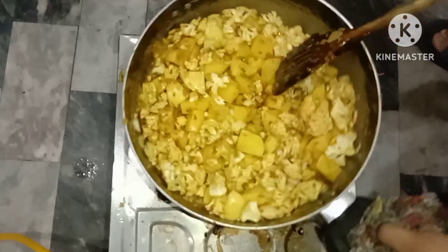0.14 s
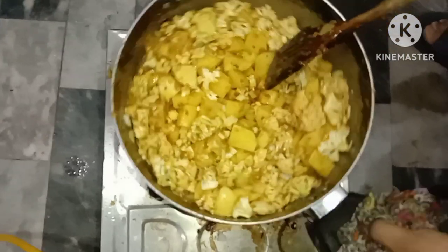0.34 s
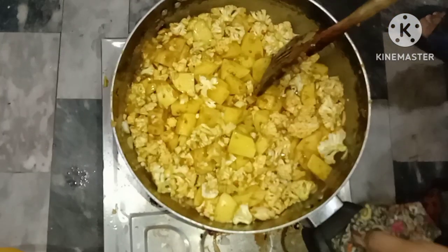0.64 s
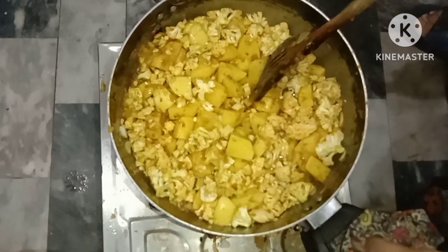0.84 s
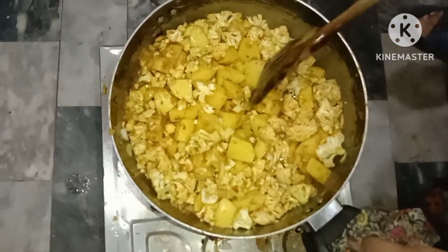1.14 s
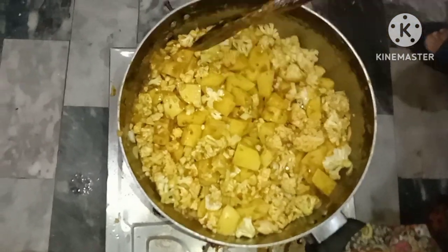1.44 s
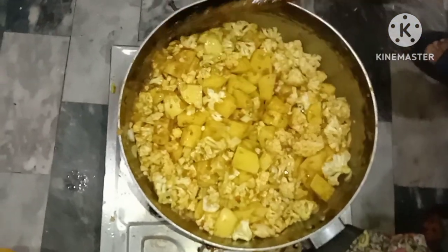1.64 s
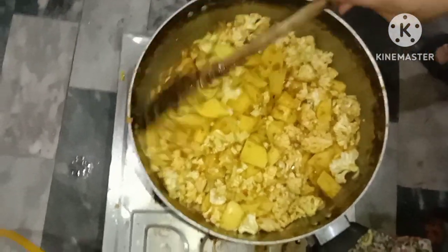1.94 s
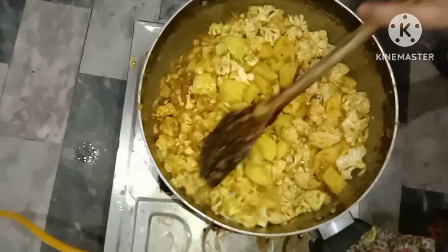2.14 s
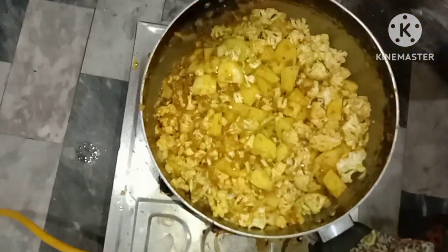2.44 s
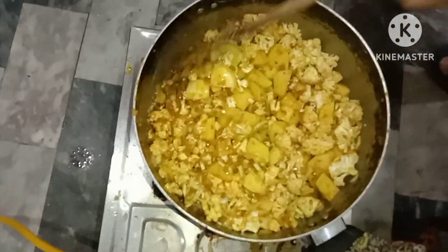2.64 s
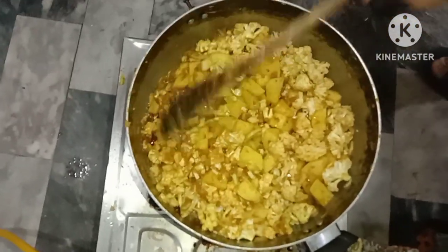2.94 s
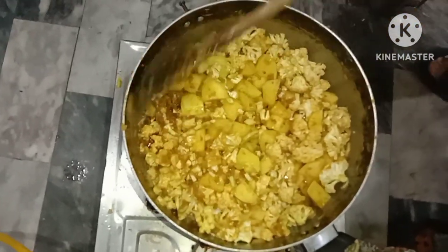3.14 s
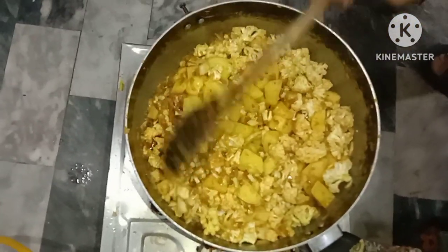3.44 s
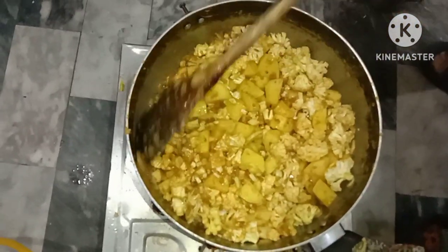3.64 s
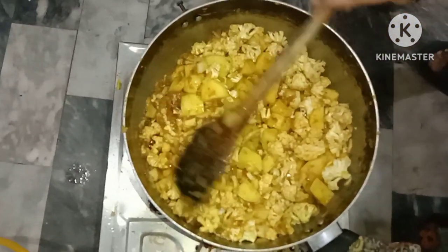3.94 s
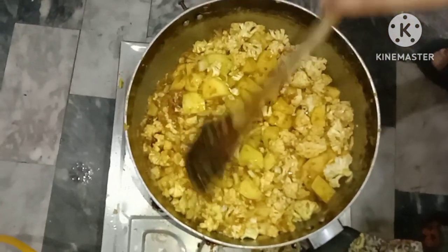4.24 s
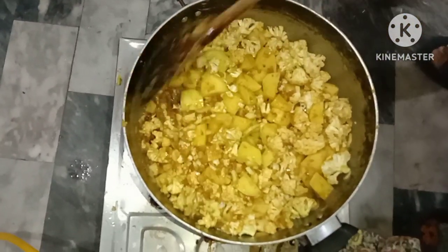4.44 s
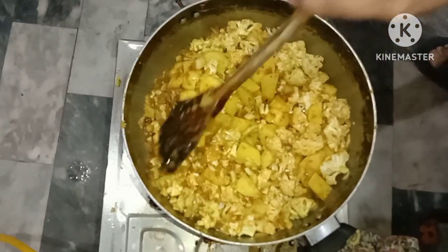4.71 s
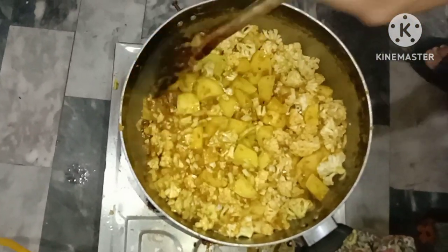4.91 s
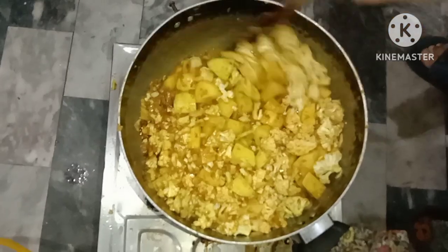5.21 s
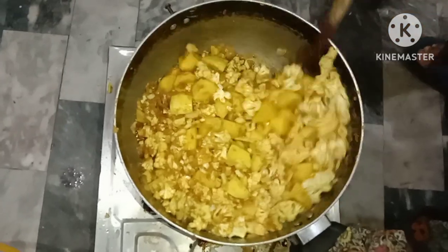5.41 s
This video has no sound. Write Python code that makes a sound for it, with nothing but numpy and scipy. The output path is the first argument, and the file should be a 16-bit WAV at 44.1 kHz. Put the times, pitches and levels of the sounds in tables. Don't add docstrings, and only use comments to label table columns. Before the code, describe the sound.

Rapid distant knocking rings off hard walls and fades, leaving vegetables fizzing in a pan, soft spoon taps and a last burst of livelier crackling.

```python
import sys
import numpy as np
from scipy import signal
from scipy.fft import rfft, irfft, next_fast_len
from scipy.io import wavfile
from scipy.ndimage import uniform_filter1d, map_coordinates

SR = 44100
rng = np.random.default_rng(int(sys.argv[2]) if len(sys.argv) > 2 else 0)


def gain_from_db(level_db):
    decades = np.asarray(level_db, float) / 20
    return 10 ** decades


def materialize(psi):
    bounded = np.clip(np.atleast_2d(psi).T, -1, 1)
    quanta = np.round(bounded * 32767).astype(np.int16)
    wavfile.write(sys.argv[1], SR, quanta)


N = 245618

# f/Hz, density/dB per Hz
MIC_FLOOR = [(20, -99), (60, -101), (110, -96.5), (200, -100), (290, -95), (400, -101.5), (900, -99)]
# f/Hz, density/dB per Hz
BURNER = [(430, -17), (520, -15), (650, -9), (790, -16.5), (950, -3.5), (1090, -10.5), (1200, -4.5)]
# f/Hz, width/Hz, level/dB
BURNER_NOTE = (292, 14, -75)
# t/s, length/s, centre f/Hz, level/dB
WISPS = [(0.975, 0.11, 704, -48), (0.98, 0.2, 497, -52), (1.103, 0.09, 990, -52.5), (1.804, 0.05, 440, -57),
         (1.84, 0.07, 730, -57.5), (1.967, 0.26, 522, -62.5), (1.988, 0.055, 1090, -51),
         (2.106, 0.14, 980, -52.5), (2.274, 0.085, 534, -57.5), (2.328, 0.091, 630, -54),
         (2.437, 0.15, 940, -54), (2.763, 0.075, 750, -55.5), (2.86, 0.14, 946, -52),
         (2.904, 0.053, 620, -59), (3.04, 0.082, 705, -62), (3.093, 0.1, 890, -57),
         (3.291, 0.061, 976, -49.5), (3.287, 0.1, 452, -53.5), (3.311, 0.21, 187, -49.5),
         (3.4, 0.096, 1014, -51.5), (3.465, 0.24, 943, -55.5), (3.539, 0.11, 247, -61.5),
         (3.677, 0.065, 690, -58), (3.774, 0.36, 987, -51.5), (4.149, 0.14, 554, -60.5),
         (4.416, 0.07, 630, -57), (4.63, 0.14, 933, -50), (4.839, 0.21, 1020, -54), (4.971, 0.09, 714, -58),
         (5.473, 0.17, 205, -56)]

# t/s, blow level/dB, crack level/dB
BANGS = [
    (-.021, -6, -10),
    (.1797, -2, -10),
    (.3763, -3, -13),
    (.5818, -1.5, -10),
]
ROOM_DB = [-18, -14, -14.5, -16.5]
# f/Hz, level/dB, t60/s
BLOCK = [(660, -20, .03), (1270, -9, .03), (1410, 1, .02), (1600, -9, .025), (2100, -22, .02),
         (4690, -20, .015), (5480, -13, .016), (6800, -16, .014)]
# t/s, peak level/dB
ECHOES = [(.0097, -21), (0.1892, -6), (0.2017, -15), (.2150, -19), (0.2477, -9), (0.2604, -8),
          (0.3878, -10), (0.3964, -12), (.4532, -13), (0.5907, -13), (0.6028, -15), (.6237, -22),
          (0.6475, -18)]
# f/Hz, density/dB per Hz
ROOM_COLOUR = [(40, -30), (100, -22.5), (170, -9), (300, -12), (700, -8.5), (900, -12), (1450, -12),
               (1900, -17.5), (2400, -25.5), (3000, -32), (4000, -51)]
# f/Hz, t60/s
KITCHEN = [(100, 1.17), (500, 1.53), (1500, 1.5), (3000, 1.2)]
# f/Hz, width/Hz, level/dB
STANDING_WAVES = [(195, 33, 4), (245, 98, 6), (292, 32, 6.5), (443, 58, 9), (554, 15, -0.5), (626, 14, 4.5),
                  (665, 55, 8), (1110, 180, 5), (1133, 11, -11), (1326, 57, 5), (1480, 16, -4),
                  (1623, 25, 7.5)]
# t/s, level/dB
RING_FADE = [(0, -3.5), (.72, -5), (.87, -10), (.93, -11), (.98, -16), (1.1, -33), (1.2, -47)]

# t/s, peak level/dB, core f/Hz, wash level/dB, wash length/s
KNOCKS = [
    (1.6957, -20.5, 950, -35.5, 0.1),
    (2.621, -48, 597, -47.5, 0.08),
    (3.2084, -23.5, 535, -38.5, 0.14),
    (4.579, -31.5, 534, -41, 0.053),
    (5.053, -38, 570, -41.5, 0.086),
    (5.173, -37, 248, -44.5, 0.089),
]
# f/Hz, density/dB per Hz
PAN = [(60, -26), (130, -33), (240, -15.5), (330, -20.5), (450, -8), (560, -10.5), (750, -8.5),
       (1000, -10.5), (1200, -7), (1600, -52)]

# t/s, peak level/dB, air level/dB relative to the peak
SPITS = [(2.013, -17, -25), (2.0388, -18, -18), (2.489, -18, -29), (2.6718, -28, -28), (3.0635, -27, -18),
         (3.5474, -32, -29), (3.58, -22, -31), (4.0818, -18, -14), (4.1946, -19, -28), (4.2637, -35, -25),
         (4.5323, -14, -28), (4.604, -20, -25), (4.674, -28, -22), (4.827, -24, -16), (4.8589, -18, -26),
         (5.028, -18, -30), (5.163, -23, -27), (5.1735, -20.5, -35), (5.222, -31, -26),
         (5.2739, -15.5, -22), (5.3202, -15, -14), (5.3382, -13, -17), (5.3687, -25, -15),
         (5.3857, -12, -23), (5.458, -21, -37), (5.4889, -14, -26)]
# t/s, peak level/dB
TICKS = [(1.6262, -30), (2.8395, -34), (3.0764, -33), (3.1518, -37), (3.3299, -34), (3.7768, -32),
         (3.8986, -36), (4.0632, -30), (4.3331, -38.5), (4.5346, -32), (4.6768, -31), (4.7332, -29),
         (4.7551, -35), (4.8235, -33), (4.8574, -34), (5.0115, -31), (5.1108, -35), (5.266, -30),
         (5.3148, -29), (5.3358, -26), (5.3632, -26), (5.473, -40)]
# t/s, fizz level/dB
HEAT = [(0.0, -41), (0.09, -34.5), (0.42, -32), (0.88, -39), (1.18, -39), (1.92, -34), (2.31, -36),
        (3.09, -35), (3.41, -34.5), (3.8, -36), (4.48, -34), (5.14, -34.5), (5.32, -33), (5.46, -29),
        (5.57, -31)]
# f/Hz, density/dB per Hz
WALL = [(950, -46), (1150, -24), (1250, 0), (1440, 2), (1800, -2), (2250, -7), (2450, -9.5), (2700, -15.5),
        (3000, -19)]
# f/Hz, density/dB per Hz
HOLLOW = [(2500, -29), (2780, -11), (2980, 4.5), (3400, 3), (3900, 2), (4250, -2), (4600, -2)]
# f/Hz, density/dB per Hz
FAT = [(3900, -8), (4300, -5.5), (4650, 0.5), (5500, 4), (6100, 1.5), (7000, -0.5), (7700, -11.5),
       (8500, -22.5), (9200, -23)]
# f/Hz, density/dB per Hz
AIR = [(8000, -44), (8700, -20), (9500, -3), (10500, 3.5), (11500, -0.5), (12600, -4.5), (13600, -3),
       (15400, 3.5), (16000, -17)]
# f/Hz, density/dB per Hz
SCRAPE = [(400, -31), (500, -3.5), (800, -2), (1100, 2.5), (1300, -10)]

# from t/s, bang t/s, level before/dB, level after/dB
DUCKS = [
    (.157, .1793, -9.5, -3),
    (.357, .3756, -7.5, -1),
    (.557, .5811, -9.5, -2),
]


def unit(x):
    return x / np.sqrt(np.mean(x ** 2) + 1e-20)


def along(points, hz):
    f, value = np.transpose(points)
    return np.interp(np.log(hz + 1), np.log(f + 1), value)


def curve(rows):
    s, value = np.transpose(rows)
    return np.interp(np.arange(N) / SR, s, value)


def wobble(rate):
    knots = rng.standard_normal(int(N * rate / SR) + 4)
    return map_coordinates(knots, [np.arange(N) * rate / SR])


def colour(spectrum):
    below = (.6 * spectrum[0][0], -110)
    above = (1.4 * spectrum[-1][0], -110)
    points = [below] + list(spectrum) + [above]
    return lambda hz: gain_from_db(along(points, hz))


def filtered(x, gain):
    m = 2 * next_fast_len(N // 2 + 8192)
    cepstrum = irfft(np.log(gain(np.fft.rfftfreq(m, 1 / SR)) + 1e-6), m)
    cepstrum[1:m // 2] *= 2
    cepstrum[m // 2 + 1:] = 0
    return irfft(rfft(x, m) * np.exp(rfft(cepstrum)), m)[:len(x)]


def patchy(x, depth_db, bins, frames, size=512):
    z = signal.stft(x, nperseg=size)[2]
    field = uniform_filter1d(rng.standard_normal(z.shape), bins, 0)
    field = uniform_filter1d(field, frames, 1)
    return signal.istft(z * gain_from_db(depth_db * unit(field)), nperseg=size)[1][:N]


def add(track, s, sound):
    start = round(s * SR)
    sound = sound[max(-start, 0):N - start]
    track[max(start, 0):][:len(sound)] += sound


def wisp(length, hz):
    half_hz = 46.8 + 0.055 * hz
    n = round((length + .04) * SR)
    sos = signal.butter(4, [hz - half_hz, hz + half_hz], "band", fs=SR, output="sos")
    band = signal.sosfilt(sos, rng.standard_normal(n + 2000))[2000:]
    swell = np.sin(np.pi * np.linspace(0, 1, n) ** 0.67) ** 0.86
    return unit(band) * swell


def rumble():
    blotches = patchy(rng.standard_normal(N), depth_db=3.5, bins=5, frames=4, size=1024)
    out = gain_from_db(-56.5) * unit(filtered(blotches, colour(BURNER)))
    out += np.sqrt(SR / 2) * filtered(rng.standard_normal(N), colour(MIC_FLOOR))
    for s, length, hz, db in WISPS:
        add(out, s - .012, gain_from_db(db + 2) * wisp(length, hz))
    note_hz, width, note_db = BURNER_NOTE
    note = filtered(rng.standard_normal(N), lambda f: 1 / (1 + ((f - note_hz) / width) ** 2))
    return out + gain_from_db(note_db) * unit(note)


def ring(modes, t):
    out = np.zeros(len(t))
    for hz, db, t60 in modes:
        out += gain_from_db(db + rng.normal(0, 1.2) - 60 * t / t60) * np.sin(2 * np.pi * hz * t)
    return out


def room_tail():
    hz, t, z = signal.stft(rng.standard_normal(3 * SR // 2), SR, nperseg=256)
    decay = gain_from_db(-60 * t / along(KITCHEN, hz)[:, None])
    tail = signal.istft(z * decay, SR, nperseg=256)[1]

    def tiled(f):
        waves_db = sum(1.09 * db / (1 + (2 * (f - c) / w) ** 2) for c, w, db in STANDING_WAVES)
        return colour(ROOM_COLOUR)(f) * gain_from_db(waves_db)

    onset = 1 - np.exp(-(np.arange(len(tail)) / SR / .008) ** 2)
    return filtered(tail, tiled) * onset


def bangs():
    blows, crack, room = np.zeros(N), np.zeros(N), np.zeros(N)
    t, t_long = np.arange(SR // 10) / SR, np.arange(SR) / SR
    rise = 1 - np.exp(-(t / .0014) ** 2)
    shimmer = gain_from_db(-36 - 60 * t_long / 1.4)
    for (s, blow_db, crack_db), room_db in zip(BANGS, ROOM_DB):
        add(blows, s, gain_from_db(blow_db + 4.5) * ring(BLOCK, t) * rise)
        add(crack, s, gain_from_db(crack_db - 60 * t / .013) * rise * rng.standard_normal(len(t)))
        add(crack, s, shimmer * rng.standard_normal(SR))
        tail = room_tail()
        add(room, s, gain_from_db(room_db) * tail / np.std(tail[:SR // 10]))
    for s, db in ECHOES:
        add(blows, s, gain_from_db(db + 4.5) * ring(BLOCK[:5], t) * rise)

    def bright(hz):
        return gain_from_db(5) * colour(FAT)(hz) + gain_from_db(-9) * colour(HOLLOW)(hz) + gain_from_db(-12) * colour(AIR)(hz)

    return blows + filtered(crack, bright) + gain_from_db(curve(RING_FADE)) * room


def tap(hz, t, slower=1):
    u = t / max(.003, 1.9 / hz) / slower
    return (u * np.exp(1 - u)) ** 3 * np.sin(2 * np.pi * hz * t)


def firm_knock(core_hz, t):
    out = np.zeros(len(t))
    for multiple, db in [(2.1, -4), (3, -7), (3.6, -11), (.3, -11)]:
        if multiple * core_hz < 1950:
            out += gain_from_db(db) * tap(max(multiple * core_hz, 170), t)
    return out


def pan_noise(top_hz, n):
    noise = rng.standard_normal(N // 8)
    return unit(filtered(noise, lambda f: colour(PAN)(f) / (1 + (f / top_hz) ** 6))[-n:])


def spoon():
    out, t = np.zeros(N), np.arange(SR // 3) / SR

    def gate(length):
        return (1 - np.exp(-(t / 0.005) ** 2)) / (1 + np.exp((t - length) / 0.011))

    for s, db, core_hz, wash_db, length in KNOCKS:
        wash = gate(length) * pan_noise(2.2 * core_hz, len(t))
        wash += gain_from_db(-5) * gate(1.8 * length) * pan_noise(300, len(t))
        add(out, s, gain_from_db(db) * tap(core_hz, t) + gain_from_db(wash_db - 60 * t / 0.5) * wash)
        if core_hz > 450:
            add(out, s, gain_from_db(db) * firm_knock(core_hz, t))
            add(out, s + .017, gain_from_db(db - 12) * tap(510, t, slower=2.5))
    return out


def spits():
    fizz, air, t = np.zeros(N), np.zeros(N), np.arange(SR // 50) / SR
    for s, db, air_db in SPITS:
        add(fizz, s, gain_from_db(db + 1.5 - 60 * t / .009) * rng.standard_normal(len(t)))
        add(air, s, gain_from_db(db + air_db + 2.5 - 60 * t / 0.0074) * rng.standard_normal(len(t)))
    for s, db in TICKS:
        add(air, s, gain_from_db(db - 3.0 - 60 * t / 0.012) * rng.standard_normal(len(t)))
    return filtered(fizz, colour(FAT)) + filtered(air, colour(AIR))


def bursts(rate, spread_db):
    size = gain_from_db(np.minimum(spread_db * rng.exponential(1, N), 19))
    return unit((rng.random(N) < rate / SR) * size * rng.standard_normal(N))


def bared():
    middle_s, rise_s = 5.344, 0.075
    return 1 / (1 + np.exp(-(np.arange(N) / SR - middle_s) / rise_s))


def sizzle():
    calm_db = -35
    rise_db = curve(HEAT) - calm_db
    clumps = gain_from_db(0.55 * wobble(9) + 0.5 * wobble(30) + 0.47 * wobble(110))
    train = bursts(2000, spread_db=2.5)

    def frying(spectrum, share, extra=0):
        hiss = patchy(rng.standard_normal(N), depth_db=1.07, bins=5, frames=6)
        return clumps * filtered(hiss + share * train + extra, colour(spectrum))

    def own(depth_db):
        return gain_from_db(depth_db * (wobble(7) + wobble(22.28)))

    body = unit(own(0.59) * frying(WALL, 0.25))
    hollow = unit(own(0.66) * frying(HOLLOW, 0.11))
    fizz = unit(own(0.13) * frying(FAT, 0.38))
    air = unit(own(0.99) * frying(AIR, .35, extra=0.42 * bursts(400, spread_db=-0.5)))
    scrape = unit(frying(SCRAPE, 0.41))

    opened = bared()
    drying_db = 0.77 * np.arange(N) / SR
    body_db = -4 + .4 * rise_db + 5 * opened
    hollow_db = -9.5 + .8 * rise_db + (5 - 1.1) * opened
    air_db = -17.5 + 0.66 * rise_db + drying_db
    fry = gain_from_db(rise_db) * fizz + gain_from_db(air_db) * air + gain_from_db(body_db) * body + gain_from_db(hollow_db) * hollow
    return gain_from_db(calm_db) * fry + gain_from_db(-37.5) * opened * scrape


def scene():
    return (rumble() + bangs() + spoon() + spits() + sizzle())[None]


def low_pass(x):
    return signal.sosfilt(signal.butter(12, 16810, fs=SR, output="sos"), x)


def record(dry):
    t, db = np.arange(N) / SR, np.zeros(N)
    for start, bang, before_db, after_db in DUCKS:
        db += before_db * ((t > start) & (t < bang))
        db += after_db * (t > bang + .006) * np.exp(-np.abs(t - bang) / 0.11)
    db = uniform_filter1d(db, size=40)
    lows = signal.sosfiltfilt(signal.butter(2, 2500, fs=SR, output="sos"), dry)
    x = gain_from_db(db) * (dry - lows) + gain_from_db(1.58 * db) * lows
    hz = np.fft.rfftfreq(N, 1 / SR)
    bass_loss = 1 / (1 - 1j * 70 / (hz + 1)) ** 2
    x = irfft(rfft(x) * (hz < 15540) * bass_loss, N)
    return low_pass(x)


dry = scene()
out = record(dry)
materialize(out)
```